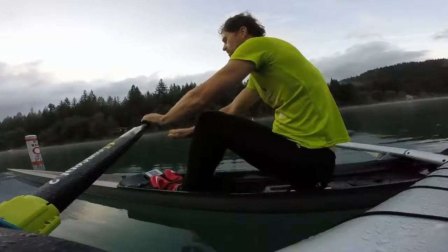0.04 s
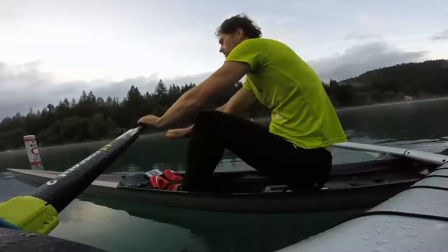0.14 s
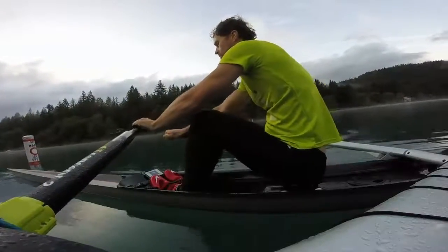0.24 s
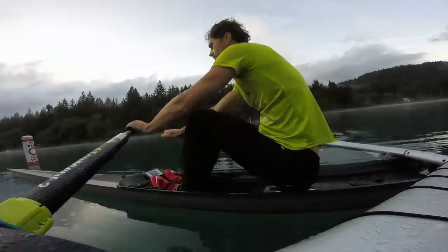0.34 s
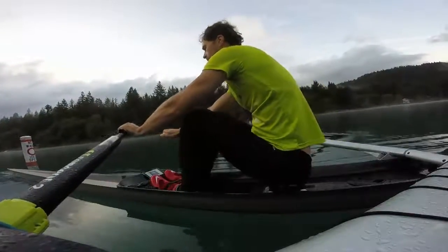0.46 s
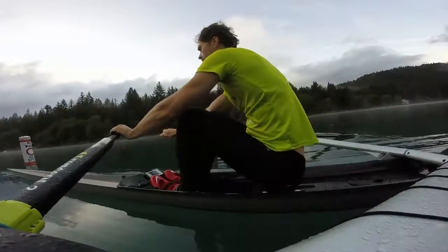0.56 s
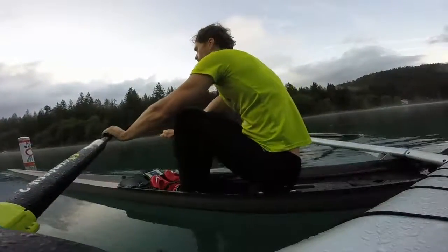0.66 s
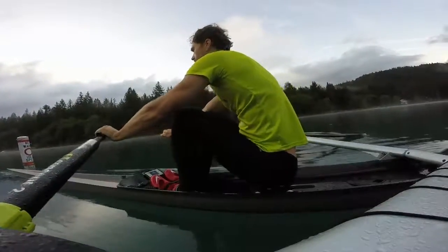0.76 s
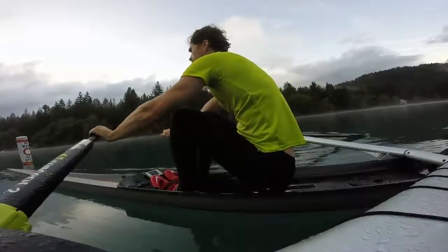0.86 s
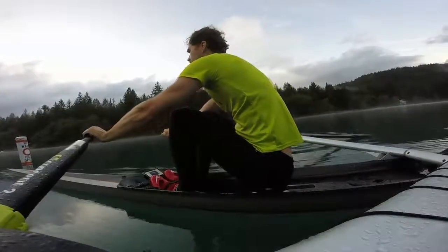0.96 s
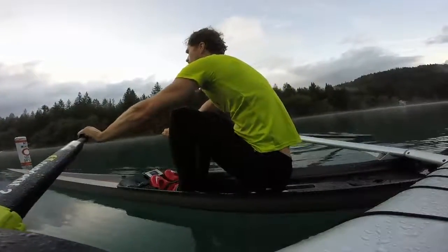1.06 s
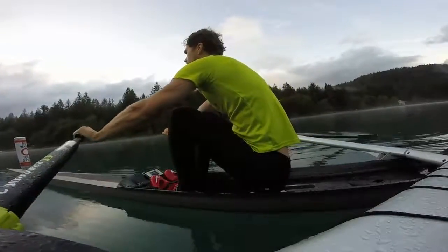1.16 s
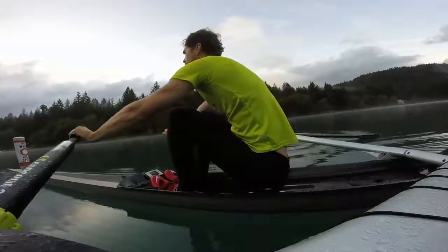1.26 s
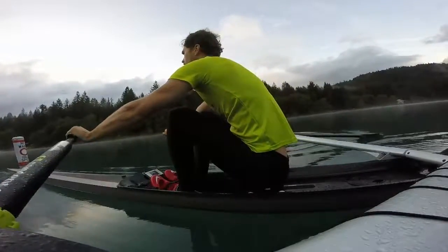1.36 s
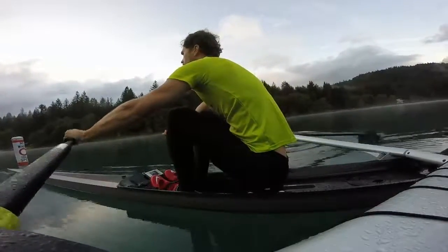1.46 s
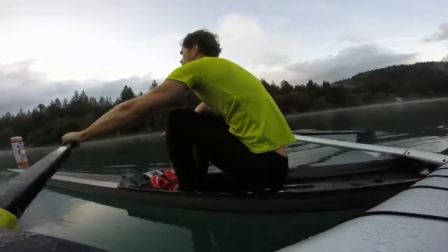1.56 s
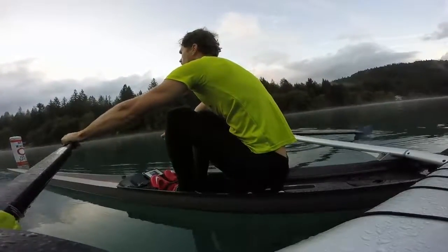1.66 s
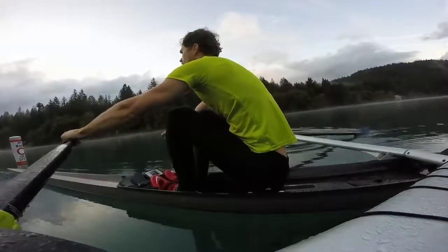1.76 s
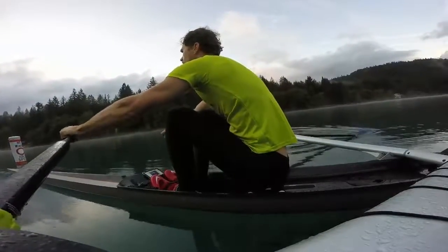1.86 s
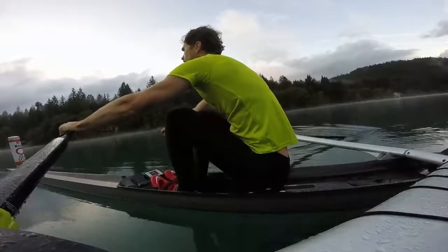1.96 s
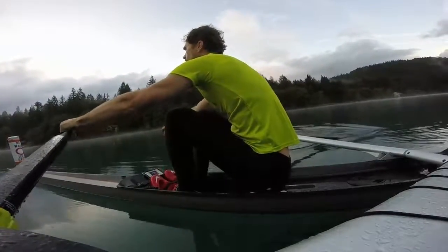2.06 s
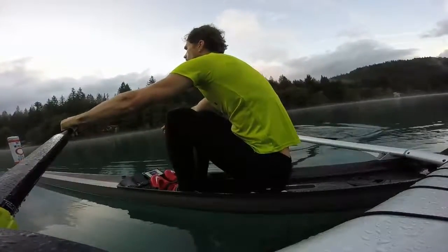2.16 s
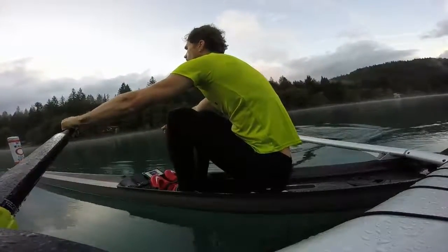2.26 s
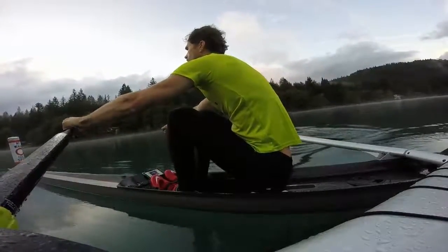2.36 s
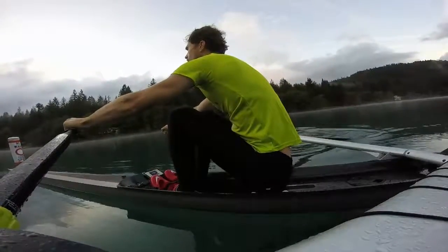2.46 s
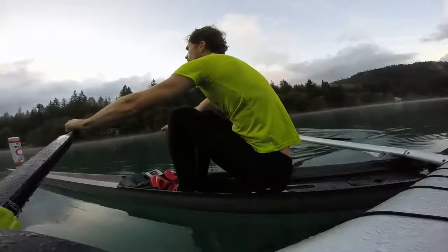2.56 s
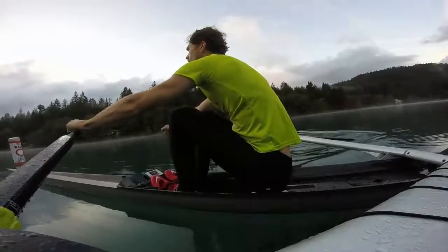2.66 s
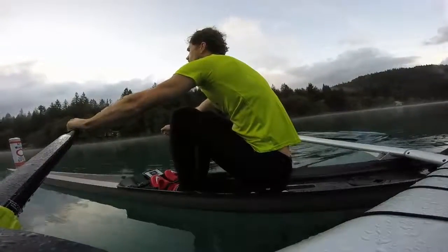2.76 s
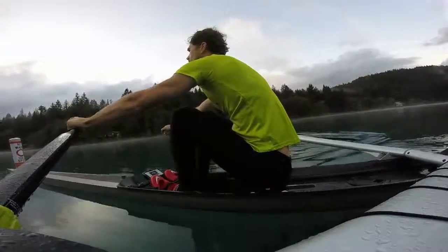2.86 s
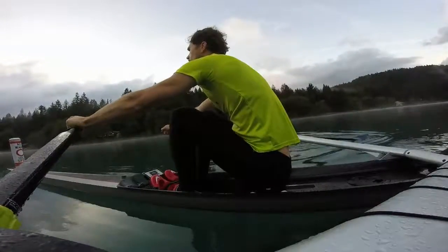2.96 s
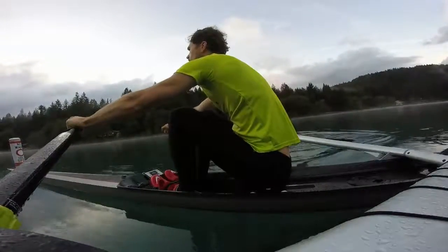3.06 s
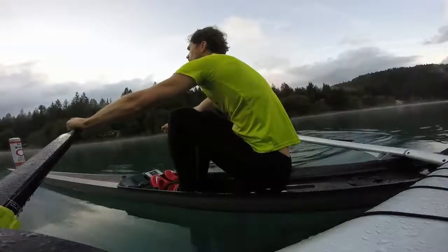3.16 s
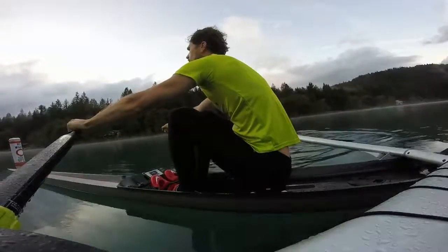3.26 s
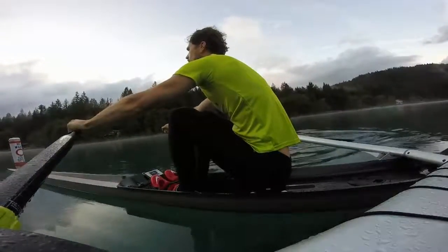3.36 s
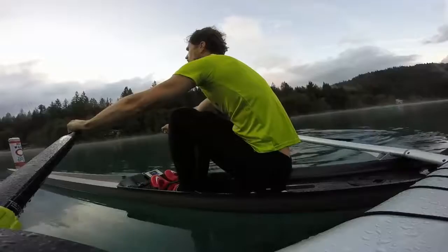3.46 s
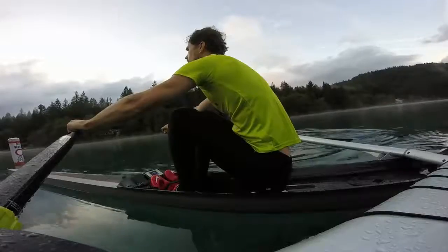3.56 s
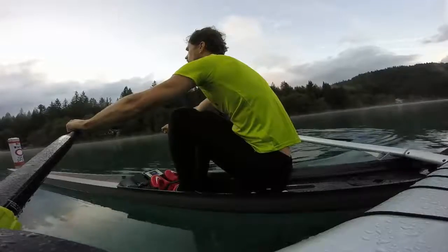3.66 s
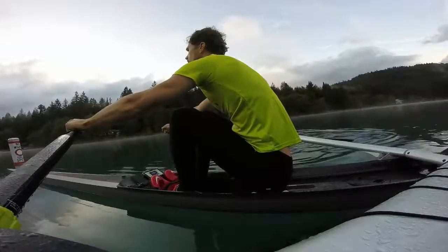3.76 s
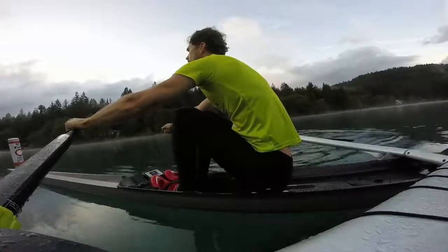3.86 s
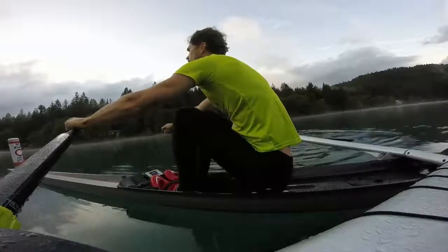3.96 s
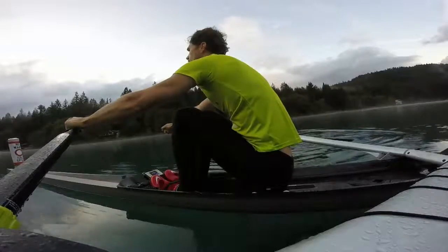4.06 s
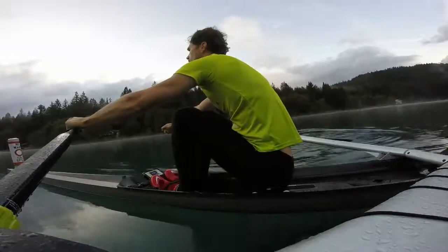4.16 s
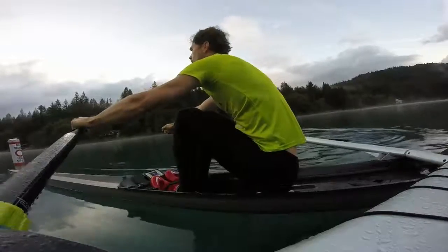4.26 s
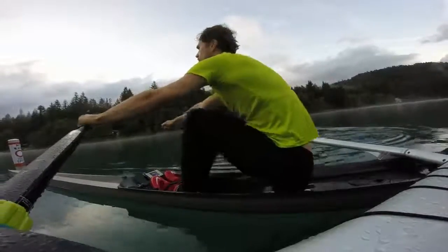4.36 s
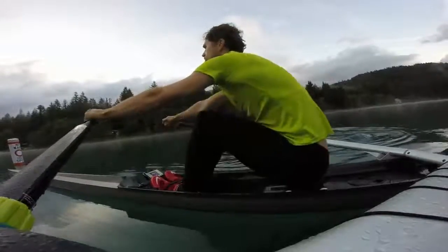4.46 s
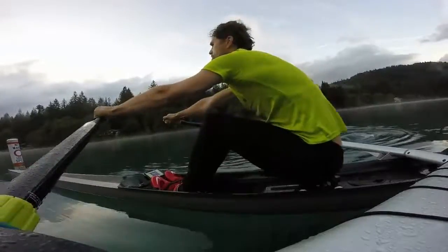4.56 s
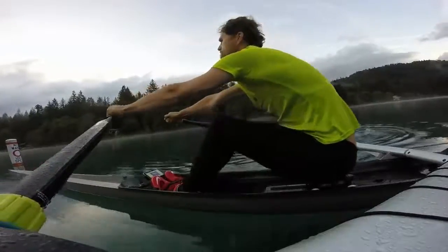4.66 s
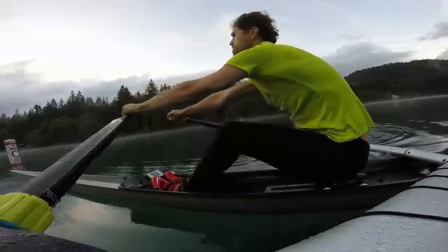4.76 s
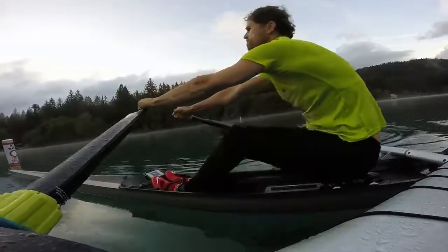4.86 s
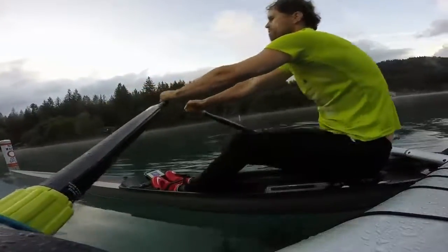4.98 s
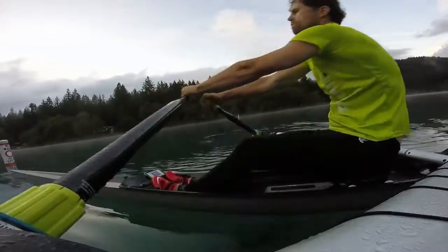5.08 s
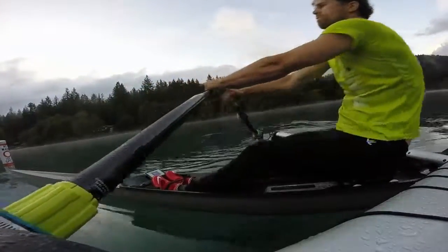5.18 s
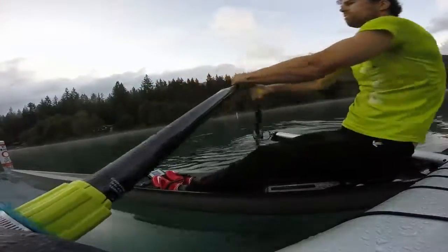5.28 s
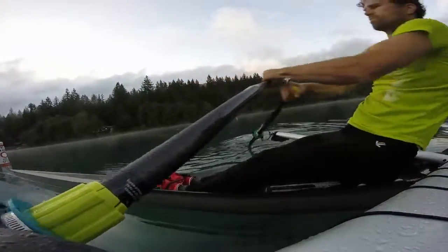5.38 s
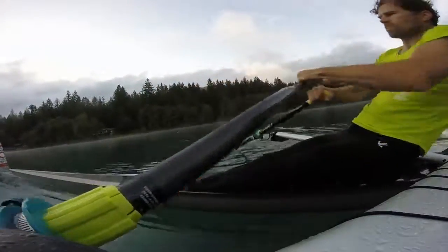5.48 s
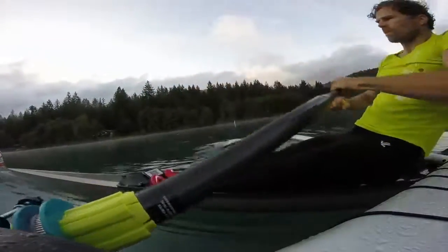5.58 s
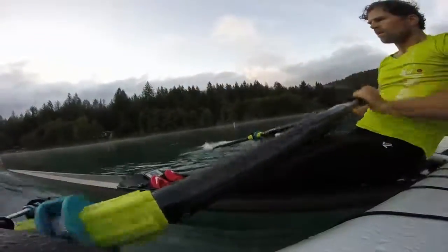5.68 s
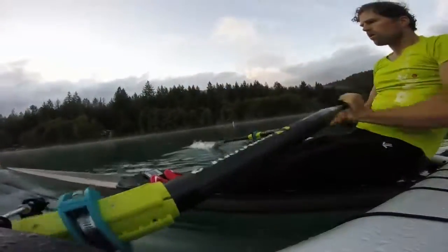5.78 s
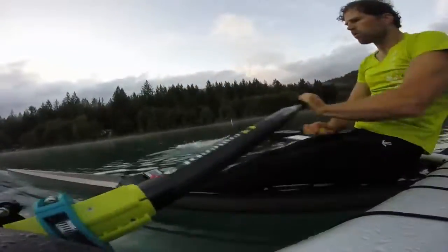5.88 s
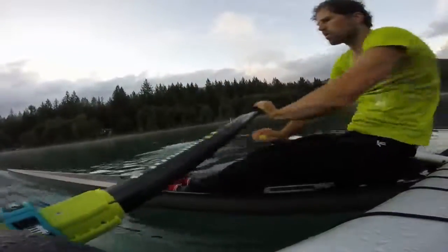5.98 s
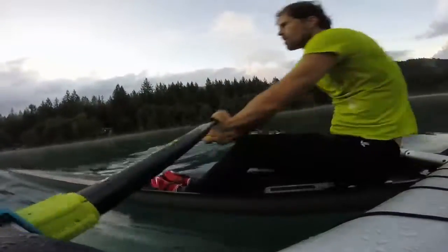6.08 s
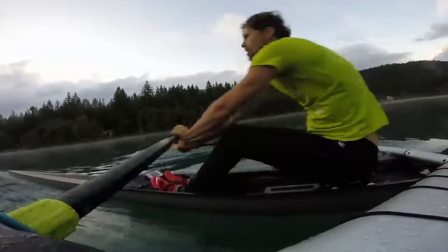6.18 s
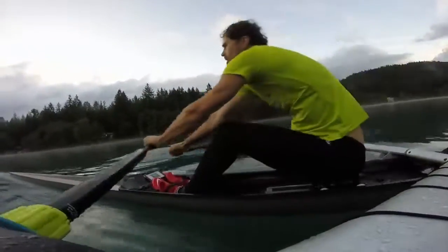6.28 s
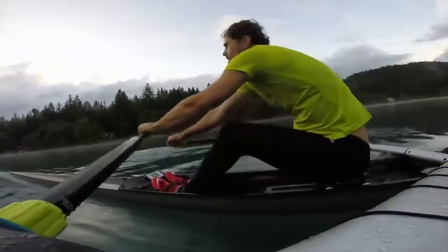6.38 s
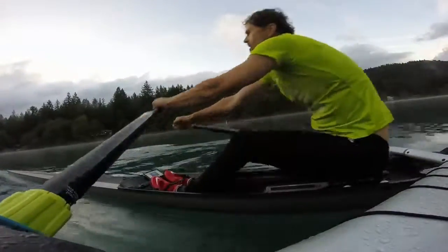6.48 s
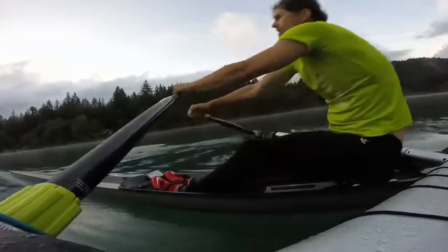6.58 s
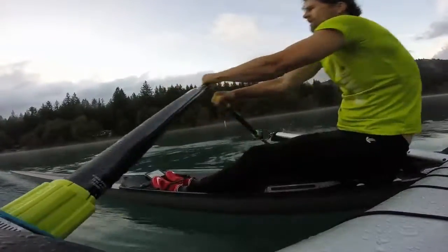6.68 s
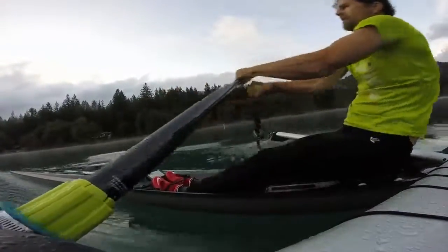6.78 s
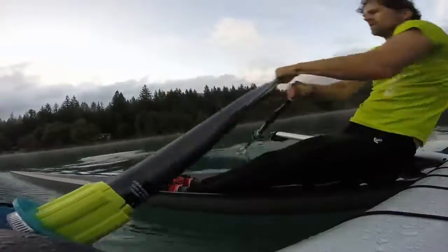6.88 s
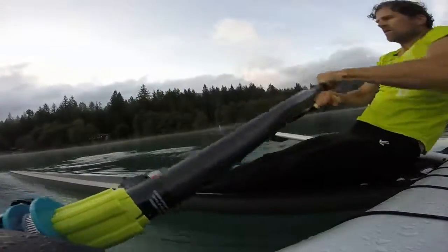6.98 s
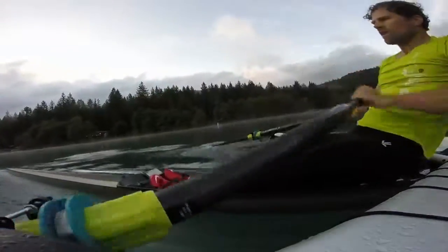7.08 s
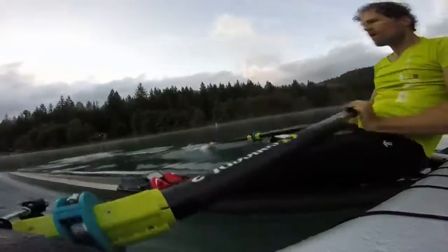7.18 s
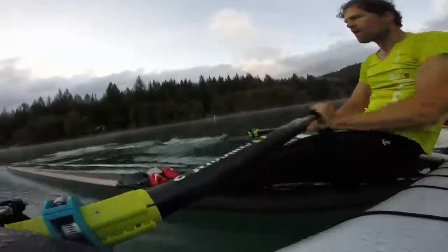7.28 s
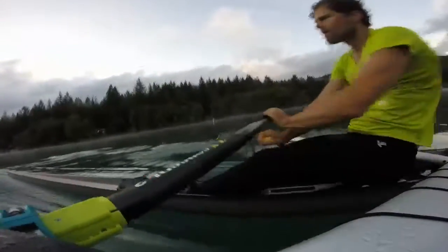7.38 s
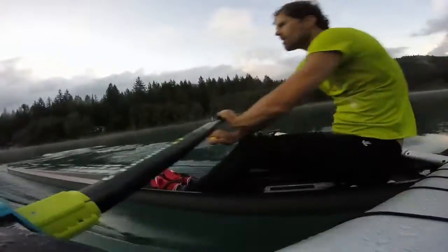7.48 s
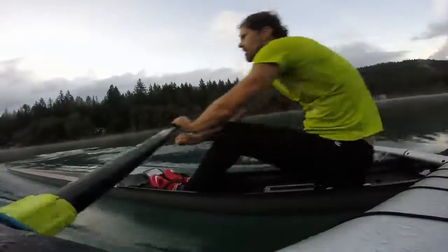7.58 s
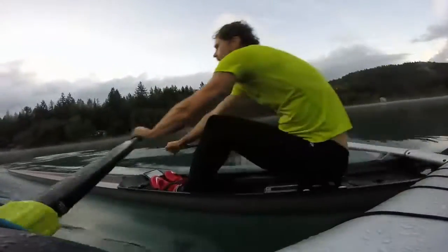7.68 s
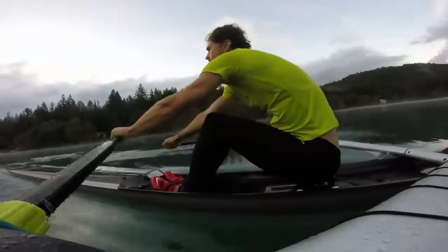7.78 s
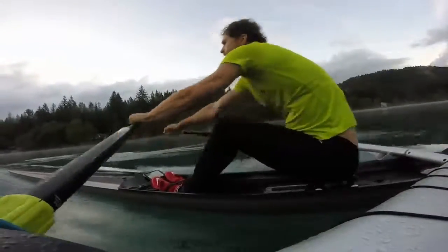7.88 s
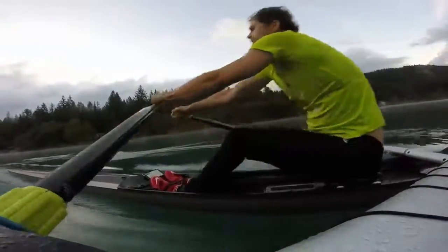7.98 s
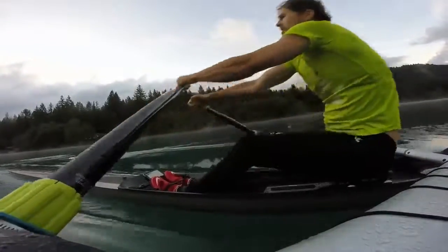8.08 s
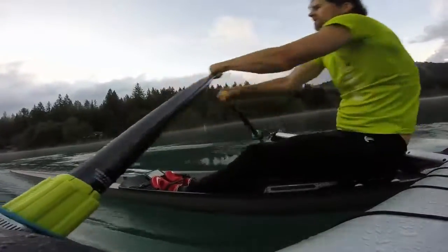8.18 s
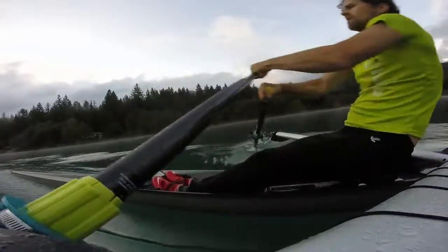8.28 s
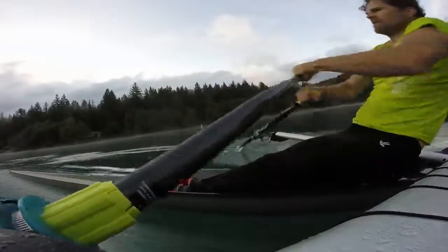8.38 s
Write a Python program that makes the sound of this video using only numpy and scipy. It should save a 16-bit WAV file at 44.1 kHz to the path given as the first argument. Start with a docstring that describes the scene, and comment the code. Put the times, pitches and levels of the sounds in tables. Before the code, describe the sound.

A close, dry, boat-borne sound from a microphone on the rigger of a rowing shell. It opens with soft steady hiss and faint low hull rumble as the seat rolls. At 0.7 s an oar knocks with a deep boom and tiny ticks; from 1.5 to 1.8 s several heavier knocks, a clack and rattling fittings follow. Then it is mostly quiet hiss, with dull low bumps, until a sharp double clack at 4.3 s. The hiss drops abruptly and slowly creeps back; the seat whirrs faintly and, from about 5 s, water fizzes thinly past. At 5.6 s a booming knock leads into dense, loud plastic clacking in the oarlocks until 6.35 s, with gurgling hull and thumps. A calmer pull follows, then another crowded clatter from 7.1 to 7.5 s and a hard cluster at 7.6-7.9 s. It ends quietly with seat roll and faint water.

```python
"""A sculler waits on a calm lake, the microphone riding on the rigger, so nearly all sound comes through the boat.
First a steady background hiss and water rumbling in the hull as the seat rolls: filtered noise and random clicks.
From 0.7 s the blades are squared: oars knock and boom (struck resonances), fittings tick, collars chatter (pings).
From 4.3 s come the strokes: the hiss drops abruptly and creeps back, the collars clack loudly in the oarlocks,
and from about 5 s the pulling blades send a rush of water past: clicks through broad resonances."""
import sys
import numpy as np
from scipy import signal
from scipy.io import wavfile

SR = 44100
rng = np.random.default_rng(int(sys.argv[2]) if len(sys.argv) > 2 else 0)


def inscribe(sig):
    """Save sig as 16-bit PCM at rate SR to the path in sys.argv[1].

    A 1-D sig is mono; a 2-D sig holds one channel per row.
    Samples are clipped to [-1, 1] before scaling.
    """
    pcm = np.round(np.clip(np.atleast_2d(sig).T, -1, 1) * 32767)
    wavfile.write(sys.argv[1], SR, pcm.astype(np.int16))


N = 372204

# Level columns are set before any *_trim_db of the function that plays them.
# resonances of the hollow hull: f/Hz, width/Hz, relative level/dB
HULL = [(133.3, 49, 5), (232, 56.5, 2.5), (306, 153, -3.5), (363, 72, -7), (467, 61.4, 0),
        (536.7, 51, -6.5), (747, 53, -11.5)]
# spectrum of a bright snap: f/Hz, relative density/dB per Hz
SNAP = [(1500, 0.5), (3000, 3), (4000, 1.5), (4800, -7.5), (5600, -5), (7000, -9.5), (8600, -12),
        (10000, -18), (11200, -20), (14000, -30.5), (16500, -31.5)]
# loud collar clacks in the oarlocks: t/s, level/dB, f/Hz, hollow ring re clack/dB, snap re clack/dB
CLACKS = [(1.731, -17, 2580, -37, -4.5), (4.3115, -16.5, 2450, -1, -10), (4.316, -15.5, 2360, -16, -7.5),
          (4.3233, -12.5, 2190, 1.5, -21), (4.3894, -25.5, 2230, 3, -11), (5.7186, -8, 2330, -6, -18),
          (5.743, -18.5, 2300, 4, -6.5), (5.7535, -4, 2530, -20, -24), (5.7842, -6.5, 2540, -15, -17),
          (5.7952, -8, 2660, -6, -21), (5.814, -10, 2380, -18, -17), (5.8317, -14.5, 2550, -8, -32),
          (5.882, -28, 2120, 1.5, -12), (5.8978, -8, 2380, -4, -21), (5.9183, -24.5, 3250, 4, -18),
          (5.939, -20.5, 2280, 3, -15), (5.9464, -12.5, 2390, -4, -8.5), (5.9749, -17.5, 3370, 2, -16),
          (6.005, -18, 2400, -26, -35), (6.0748, -6, 2250, -16, -19.5), (6.0882, -23.5, 2310, -7, -15),
          (6.107, -14.5, 2570, -13, -12), (6.1168, -15, 2170, -3.5, -12), (6.1456, -13.5, 2210, -4.5, -10),
          (6.1676, -21, 2360, -6, -24), (6.1873, -19.5, 3080, 3, -14), (6.198, -20, 2300, 0.5, -25),
          (6.2841, -17.5, 2280, 5.5, -21), (6.3031, -8, 2360, 1, -26), (6.3382, -16, 1870, 0, -14),
          (6.352, -21, 2350, 3, -15), (6.532, -22.5, 2500, -0.5, -15), (7.0862, -13.5, 2500, -5.5, -9),
          (7.1212, -8, 2360, -1, -18), (7.1365, -6.5, 3160, -0.5, -13.5), (7.1559, -17.5, 2220, 4, -28),
          (7.2053, -9.5, 2240, -5.5, -26), (7.21, -5, 2500, -23, -3.5), (7.2206, -7.5, 2520, -6, -8.5),
          (7.2493, -20.5, 3200, -12.5, -25), (7.2764, -9.5, 2630, -7, -26), (7.2903, -23, 2460, -19.5, -10),
          (7.3055, -11, 2870, -9, -19), (7.3344, -18.5, 2310, -2, -11.5), (7.3723, -14, 2530, -29, -16),
          (7.3991, -10, 2590, -25.5, -30), (7.407, -18.5, 1950, 3.5, -12), (7.4297, -8.5, 2460, -2.5, -18),
          (7.4352, -13, 2240, -23.5, -8), (7.4508, -18, 3080, -2.5, -20), (7.4932, -9.5, 2500, -30, -19),
          (7.6331, -8.5, 2370, -8.5, -18.5), (7.6815, -2.5, 2640, -27, -15), (7.714, -20, 2520, -2, -24),
          (7.7359, -1.5, 2400, -9, -20), (7.773, -8, 2610, -8, -13.5), (7.7881, -15, 2530, -17, -11),
          (7.8106, -13, 2420, 0, -12.5), (7.9386, -22, 2200, 5.5, -19)]


def amp(db):
    """Decibels to gain."""
    return 10 ** (np.asarray(db) / 20)


def unit_rms(x):
    """Scales to rms 1."""
    return x / np.sqrt(np.mean(x ** 2) + 1e-20)


def unit_peak(x):
    """Scales to peak 1."""
    return x / (abs(x).max() + 1e-12)


def add(mix, s, sound):
    """Mixes a sound in at time s."""
    part = mix[max(round(s * SR), 0):][:len(sound)]
    part += sound[:len(part)]


def causal(gain):
    """Minimum-phase impulse response: it has this gain and starts as sharply as it can."""
    log_gain = np.log(np.maximum(np.r_[gain, gain[-2:0:-1]], 1e-5))
    return np.fft.ifft(np.exp(np.conj(signal.hilbert(log_gain)))).real


def colour(points, size=8192):
    """Impulse response of a spectrum, joined up along log frequency."""
    hz, db = np.transpose(points)
    log_hz = np.log(np.fft.rfftfreq(size, 1 / SR) + 1)
    return causal(amp(np.interp(log_hz, np.log(hz), db)))


def body(resonances, size=8192):
    """Impulse response of resonances, each about 4.6 dB down half a width from its centre."""
    f = np.fft.rfftfreq(size, 1 / SR)
    power = sum((amp(db) / (1 + ((f - hz) / width * 1.67) ** 2)) ** 2 for hz, width, db in resonances)
    return causal(np.sqrt(power))


def struck(resonances, spread_db):
    """Each blow lands elsewhere, and so favours other resonances."""
    return body([(hz, width, db + spread_db * rng.standard_normal()) for hz, width, db in resonances], size=2048)


def through(x, response):
    """Filters x and keeps its length."""
    return signal.fftconvolve(x, response)[:len(x)]


def grains(per_s, spread_db, size=N):
    """Sparse random clicks whose size varies with spread_db."""
    chance, clicks = rng.random(size) * SR / per_s, np.zeros(size)
    at = np.flatnonzero(chance < 1)
    rarity = np.minimum(-np.log(chance[at] + 1e-9), 4)
    # a positive spread makes the rarer clicks larger; each click is positive or negative at random
    clicks[at] = amp(spread_db * rarity) * (-1.) ** at
    return clicks


def lumps(per_s, depth_db):
    """A gain that wanders at random."""
    knots = rng.standard_normal(2000)
    return amp(depth_db * np.interp(np.arange(N) / SR * per_s, np.arange(len(knots)), knots))


def hump(start, end, db, rise_db_per_s, fall_db_per_s):
    """A gain that rises until start, holds until end, then falls."""
    t = np.arange(N) / SR
    before, after = np.maximum(start - t, 0), np.maximum(t - end, 0)
    return amp(db - rise_db_per_s * before - fall_db_per_s * after)


def swell(t, peak_s):
    """Envelope of one contact: it peaks after peak_s and dies quickly."""
    return (t / peak_s) ** 2 * np.exp(2 - 2 * t / peak_s)


def ping(t, hz, swell_s):
    """A heavily damped mode that lasts only a few cycles."""
    return swell(t, swell_s) * np.sin(2 * np.pi * (hz * t + rng.random()))


def ring(modes, t, detune):
    """Decaying modes, each detuned a little at random for every blow."""
    hz, db, t60 = np.transpose(modes)[:, :, None]
    hz = hz * (1 + detune * rng.standard_normal(hz.shape))
    coarse = np.linspace(0, t[-1], num=4000)  # ample for low modes
    wave = (amp(db - 60 * coarse / t60) * np.sin(2 * np.pi * hz * coarse)).sum(axis=0)
    return unit_peak(np.interp(t, coarse, wave))


def hiss():
    """Steady background hiss: noise whose level drops abruptly after 4.3 s, then creeps back."""
    # colour of the hiss: f/Hz, relative density/dB per Hz
    hiss_spectrum = [(40, 14), (100, -2), (300, -9), (600, -12.5), (1200, -17), (2500, -21), (5000, -27.5),
                     (9000, -35.5), (14000, -45), (16000, -58)]
    # loudness of the hiss: t/s, rms level/dB
    hiss_level = [(0, -46.5), (4.3, -47), (4.45, -78), (8.44, -51)]
    s, db = np.transpose(hiss_level)
    gain = amp(np.interp(np.arange(N) / SR, s, db))
    return unit_rms(through(rng.standard_normal(N), colour(hiss_spectrum))) * gain


def rocking():
    """Gain of the boat's rocking: each shift of weight sets it off and it settles."""
    # shifts of weight: t/s, level/dB
    lurches = [(0.0, -19.5), (1.8, -12), (2.54, -35), (2.78, -36.5), (3.14, -30.5), (4.44, -32),
               (5.78, -20), (7.14, -24.5)]
    return sum(hump(s, s, db, rise_db_per_s=221, fall_db_per_s=63.5) for s, db in lurches)


def sliding(column, follows, gather_db_per_s=14.5, slacken_db_per_s=10.5, edge_s=0.061):
    """Gain of one sound over all seat runs, changing by follows dB per dB of speed."""
    # runs of the seat, forward in the recovery and back in the drive:
    # start t/s, fastest t/s, stop t/s, wheel level/dB, hull water level/dB, sway level/dB
    slides = [(-0.1, 0.6, 0.67, -58, -53, -38.5), (1.457, 1.663, 1.66, -62.5, -38, -22),
              (4.28, 5.303, 5.91, -47, -35.5, -29), (5.62, 5.713, 5.86, -54.5, -38.5, -20),
              (6.088, 6.25, 6.34, -63, -42, -24.5), (6.47, 6.855, 7.07, -55, -46, -37.5),
              (7.104, 7.2, 7.9, -61, -39.5, -22), (7.937, 8.44, 8.4, -55.5, -41, -33.5)]
    t, gain = np.arange(0, N, 64) / SR, 0
    for slide in slides:
        start, fastest, stop = slide[:3]
        speed_db = -gather_db_per_s * np.maximum(fastest - t, 0) - slacken_db_per_s * np.maximum(t - fastest, 0)
        # fades in just ahead of the start and out just after the stop
        moving = np.clip(1 + np.minimum(t - start, stop - t) / edge_s, 0, 1)
        gain = gain + moving * amp(slide[column] + follows * speed_db)
    return np.interp(np.arange(N) / SR, t, gain)


def sway(trim_db=1):
    """The rigger sways as the boat rocks and the seat runs: very low noise."""
    # colour of the sway: f/Hz, relative density/dB per Hz
    sway_spectrum = [(12, -29.5), (29, -18.5), (39, 1), (49, -10), (70, -14), (100, -28), (135, -29.5),
                     (180, -40.5), (300, -50.5), (600, -98)]
    noise = unit_rms(through(rng.standard_normal(N), colour(sway_spectrum)))
    return amp(trim_db) * noise * np.hypot(rocking(), sliding(column=5, follows=0.68))


def rumble(trim_db=3, lap_db=-32, calm_db=-72):
    """Water gurgles on the hollow hull: each resonance is stirred by its own ripples."""
    gurgle = 0
    for mode in HULL:
        ripples = grains(per_s=660, spread_db=2.5) * lumps(per_s=25, depth_db=4.5)
        gurgle = gurgle + through(ripples, body([mode]))
    # it rocks (lap, re rocking) or lies still (calm); levels before the trim
    at_rest = amp(lap_db) * rocking() + amp(calm_db)
    return amp(trim_db) * unit_rms(gurgle) * np.hypot(sliding(column=4, follows=1.0), at_rest)


def whirr():
    """Seat wheels run on their tracks: dense small clicks excite the track resonances."""
    # resonances of the seat tracks: f/Hz, width/Hz, relative level/dB
    tracks = [(800, 29, 2), (1129, 66, 3.5), (1394, 160, 6), (1370, 27, 1.5), (1700, 720, -8.5),
              (2400, 690, -10), (3500, 60, -12.5)]
    clicks = grains(per_s=2900, spread_db=3.0) * lumps(per_s=17, depth_db=2.0)
    return unit_rms(through(clicks, body(tracks))) * sliding(column=3, follows=0.75)


def thumps(lead_s=0.00303, per_clack_db=0.35, per_hollow_db=0.2):
    """The oar behind a clack thumps the hull, the more so the harder and hollower the clack."""
    base_db = np.array([-17.5, -23.5, -21, -39.5])  # knock, boom, drumming, rattle at 0 dB clack and hollow ring
    return [(s - lead_s, *(base_db + per_clack_db * db + per_hollow_db * hollow))
            for s, db, hz, hollow, bright in CLACKS]


def hull_knock(t, knock_db, scuff=0.22, scuff_s=0.0055, shudder=0.025, shudder_s=0.033,
               soft_hz=640, soft_db=-25.5, hardening=0.26):
    """A sharp blow with scuffing behind it excites hull and pin; harder is briefer, so brighter."""
    # resonances of the oarlock pin: f/Hz, width/Hz, relative level/dB
    pin = [(680, 120, -16.5), (1010, 140, -23.5)]
    push = rng.standard_normal(len(t)) * (scuff * np.exp(-t / scuff_s) + shudder * np.exp(-t / shudder_s))
    push[0] += 1  # the blow itself, ahead of the scuffing
    edge_hz = np.clip(soft_hz * amp(hardening * (knock_db - soft_db)), 380, 3000)
    push = signal.sosfilt(signal.butter(2, edge_hz, fs=SR, output="sos"), push)
    return unit_peak(through(push, struck(HULL + pin, spread_db=3.5)))


def drumming(t, murmur, drum_hz=137, drum_scatter=0.044, drum_s=0.011, deck_db=-15, deck_s=0.07, shell_db=-11):
    """A panel drums briefly, its pitch scattered a little at random; the deck murmurs and the shell rings on."""
    # long ring of the whole shell: f/Hz, relative level/dB, t60/s
    shell = [(58.24, -2, 1), (88.5, -3, 0.91), (129.5, -2, 0.93), (202.1, -10, 0.36), (242, -16.5, 0.17)]
    hz = drum_hz * (1 + drum_scatter * rng.standard_normal())
    panel = np.sin(2 * np.pi * hz * t) * np.exp(-t / drum_s)
    deck = amp(deck_db) * murmur * np.exp(-t / deck_s)
    return panel + deck + amp(shell_db) * ring(shell, t, detune=0.031)


def rattling(t, snap, decay_s=0.027):
    """Small parts rattle on in tiny bursts, each a brief scrape."""
    clicks = abs(grains(per_s=240, spread_db=0.0, size=len(t)))
    bursts = through(clicks, swell(np.arange(SR // 100) / SR, 0.00084))
    shaken = bursts * rng.standard_normal(len(t)) * np.exp(-t / decay_s)
    return unit_peak(through(shaken, snap))


def knocks(knock_trim_db=3, boom_trim_db=1, rattle_trim_db=2, thud_hz=87, thud_db=-6, thud_s=0.015):
    """An oar meets its pin: the hull knocks, the rigger booms, panels drum and small parts rattle."""
    # heavy oar knocks: t/s, knock level/dB, deep boom level/dB, drumming level/dB, rattle level/dB
    heavy_knocks = [(0.725, -15, -1, -11, -40), (1.118, -42, -32.5, -35.5, -69),
                    (1.494, -28.5, -18, -20.5, -56), (1.565, -7.5, -3, -5.5, -30),
                    (1.624, -34, -7.5, -21, -35.5), (1.667, -25, -15, -15, -44), (1.724, -14, -11, -4, -29),
                    (1.762, -16.5, -8.5, -8.5, -51), (1.818, -23.5, -22, -15, -41),
                    (2.17, -44.5, -24.5, -33.5, -70), (2.43, -38, -26, -43, -70),
                    (2.963, -34, -15, -19, -70), (4.287, -26.5, -20, -27, -45), (4.308, -7, -28, -1, -25.5),
                    (4.369, -28, -29, -20, -27), (4.994, -26, -28.5, -27, -58),
                    (5.272, -22, -27.5, -44, -43), (5.615, -12, -2.5, -0.5, -19),
                    (5.735, -13.5, -10.5, -22, -45), (5.78, -9.5, -22, -30, -19.5),
                    (5.896, -21.5, -16, -31, -34), (6.07, -16.5, -16, -24, -43),
                    (6.265, -19.5, -34, -9.5, -28), (6.297, -9, -17, -20, -18.5),
                    (6.457, -29.5, -25, -19.5, -45), (6.608, -54, -30.5, -15.5, -44),
                    (7.076, -10.5, -8.5, -13.5, -15), (7.091, -7, -6, -12.5, -36),
                    (7.153, -18, -11, -13.5, -26.5), (7.204, -12.5, -23, -13.5, -21),
                    (7.425, -14.5, -13.5, -21, -31), (7.623, -17, -22, -22, -30),
                    (7.732, -16, -29.5, -11, -26), (7.768, -13.5, -36.5, -13, -35),
                    (7.898, -19.5, -19, -28, -38), (8.091, -27, -31.5, -15, -66)]
    # slow bending modes of the rigger: f/Hz, relative level/dB, t60/s
    rigger_modes = [(38.7, 9.5, 0.46), (51.7, -3.5, 0.42), (68, -1.5, 0.2)]
    # resonances of the deck panels: f/Hz, width/Hz, relative level/dB
    deck_panels = [(61.6, 18, 4), (93, 17, -2.5), (142.3, 19, 1.5), (165.5, 28, -8.5), (242, 45, -12.5)]
    out, t = np.zeros(N), np.arange(SR * 3 // 4) / SR
    short, snap = t[:SR // 5], colour(SNAP, size=512)
    murmur = unit_rms(through(rng.standard_normal(N + len(t)), body(deck_panels)))
    thud = amp(thud_db) * np.sin(2 * np.pi * thud_hz * t) * np.exp(-t / thud_s)
    for s, knock, boom, drum, rattle in heavy_knocks + thumps():
        add(out, s, amp(knock + knock_trim_db) * hull_knock(short, knock))
        low = amp(boom + boom_trim_db) * (ring(rigger_modes, t, detune=0.011) + thud)
        low += amp(drum) * drumming(t, murmur[round(s * SR):][:len(t)])
        add(out, s, -low * (1 - np.exp(-t / 0.0023)))  # the low sounds fade in over a few ms
        add(out, s, amp(rattle + rattle_trim_db) * rattling(short, snap))
    return out


def chatter(per_s, column, fade_db=-4.5, spread_db=3):
    """Uneven light contacts that fade through each flurry: rows of (s, dB)."""
    # flurries while the oars turn and shake: start t/s, end t/s, tick level/dB, light clack level/dB
    flurries = [(0.747, 0.80, -33.5, -67), (1.659, 1.84, -37, -62), (4.32, 4.47, -38, -52),
                (5.713, 5.99, -29.5, -29), (6.081, 6.35, -34, -36), (7.08, 7.36, -33, -24.5),
                (7.732, 7.83, -27.5, -30.5), (7.965, 8.021, -36, -56)]
    rows = []
    for flurry in flurries:
        start, end = flurry[:2]
        times = start + (np.arange(40) + rng.random(40)) / per_s
        fade = fade_db * (times - start) / (end - start)
        levels = flurry[column] + fade + spread_db * rng.standard_normal(len(times))
        rows += [(s, db) for s, db in zip(times, levels) if s < end]
    return rows


def ticks(trim_db=1, tone_db=-1, contact_s=0.0019, light_hz=3070, light_scatter=0.023):
    """Loose fittings tick: a tiny bright noise contact with a damped ping."""
    # loud ticks of loose fittings: t/s, level/dB, f/Hz
    loud_ticks = [(0.726, -39, 2970), (0.7693, -28.5, 4160), (1.5788, -21.5, 3100), (1.6408, -25.5, 3180),
                  (1.7641, -27, 4270), (1.796, -33, 3400), (4.3477, -35, 3070), (4.419, -35.5, 5860),
                  (4.45, -33.5, 3430), (5.6332, -21, 3280), (5.6489, -29, 3150), (5.705, -24.5, 3180),
                  (6.2416, -37, 3080), (6.394, -36.5, 3200), (6.424, -41, 3824), (6.499, -42.5, 3260),
                  (6.551, -39, 3270), (6.6314, -47, 3060), (7.1124, -32, 3200), (7.4688, -29, 3170),
                  (7.5917, -40, 3070), (7.8375, -31.5, 3180), (7.909, -37, 3100)]
    out, t, snap = np.zeros(N), np.arange(SR // 30) / SR, colour(SNAP)
    light = [(s, db, light_hz * np.exp(light_scatter * rng.standard_normal()))
             for s, db in chatter(per_s=40, column=2)]
    for s, db, hz in loud_ticks + light:
        crack = unit_peak(through(rng.standard_normal(len(t)) * swell(t, contact_s), snap))
        add(out, s, amp(db + trim_db) * (crack + amp(tone_db) * ping(t, hz, swell_s=0.00035)))
    return out


def contacts(rebound_s=0.007, rebound_db=-16, rebound_scatter=0.15,
             light_hz=2400, light_hollow_db=-2, light_snap_db=-12, pitch_scatter=0.08):
    """Every touch of a collar: loud clacks, one weaker rebound of each, and light chatter."""
    gaps = rebound_s * np.exp(rebound_scatter * rng.standard_normal(len(CLACKS)))
    rebounds = [(s + gap, db + rebound_db, *tone) for (s, db, *tone), gap in zip(CLACKS, gaps)]
    light = [(s, db, light_hz * np.exp(pitch_scatter * rng.standard_normal()), light_hollow_db, light_snap_db)
             for s, db in chatter(per_s=22, column=3)]
    return CLACKS + rebounds + light


def clacks(trim_db=2, upper_hz=3170, upper_db=-12, snap_trim_db=3, snap_s=0.0016,
           tail_db=-17, tail_s=0.0063, hum_db=-33, hum_s=0.026, graze_db=-22, graze_s=0.0023):
    """Plastic collars strike the oarlocks: a graze, a dead clack, a bright snap, and the frame rings on."""
    # ringing of the oarlock frame: f/Hz, width/Hz, relative level/dB
    lock_frame = [(1168, 51, -0.5), (1420, 110, -5), (1884, 250, -5), (2360, 330, 3), (3150, 220, -17),
                  (3800, 880, -29.5)]
    out, t = np.zeros(N), np.arange(SR // 10) / SR
    snap = colour(SNAP, size=512)
    for s, db, hz, hollow, bright in contacts():
        crack, scatter = rng.standard_normal((2, len(t)))
        contact = np.exp(0.38 * rng.standard_normal())  # no two contacts last equally long
        clack = ping(t, hz, swell_s=0.00082 * contact)
        clack += amp(hollow) * ping(t, rng.uniform(1435.6, 1465.2), swell_s=0.001 * contact)
        clack += amp(upper_db) * ping(t, upper_hz, swell_s=0.0016)
        clack += amp(bright + snap_trim_db) * unit_peak(through(crack * swell(t, snap_s * contact), snap))
        frame = unit_rms(through(scatter, struck(lock_frame, spread_db=6.5)))
        clack += frame * (amp(tail_db) * np.exp(-t / tail_s) + amp(hum_db) * np.exp(-t / hum_s))
        add(out, s, amp(db + trim_db) * clack)
        # the collar slides for a moment before it seats
        add(out, s - t[-1], amp(db + graze_db) * frame * np.exp((t - t[-1]) / graze_s))
    return out


def rush():
    """Spray fizzes past while the blades pull: dense clicks through the resonances of the water."""
    # resonances that colour the rush: f/Hz, width/Hz, relative level/dB
    water = [(1748, 300, -6.5), (2490, 440, 4.5), (3190, 150, 5.5), (3600, 380, -9), (4100, 1400, -8),
             (6070, 1300, -9), (8250, 2300, -15.5), (11000, 2000, -32.5)]
    # blades pulling through the water: grip t/s, release t/s, level/dB
    pulls = [(4.98, 5.855, -58), (7.0, 7.1, -66), (8.36, 8.6, -65)]
    pulling = sum(hump(grip, release, db, rise_db_per_s=91.5, fall_db_per_s=41) for grip, release, db in pulls)
    fizz = grains(per_s=1900, spread_db=-1.5) * lumps(per_s=71, depth_db=3.0)
    return unit_rms(through(fizz, body(water))) * pulling


def scene():
    """The whole boat and the background hiss, heard at one point."""
    return (hiss() + sway() + rumble() + whirr() + knocks() + ticks() + clacks() + rush())[None]


def record(dry, edge_hz=16300):
    """The slowest motion is removed, the hardest blows round off at full scale; then the band limit."""
    heard = signal.sosfilt(signal.butter(1, 10, "highpass", fs=SR, output="sos"), dry)
    rounded = heard / (1 + heard ** 8) ** (1 / 8)
    lowpass = signal.firwin(511, edge_hz, window=("kaiser", 9), fs=SR)
    return signal.oaconvolve(rounded, lowpass[None], "same")


dry = scene()
out = record(dry)
inscribe(out)
```